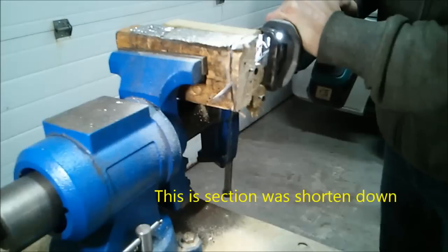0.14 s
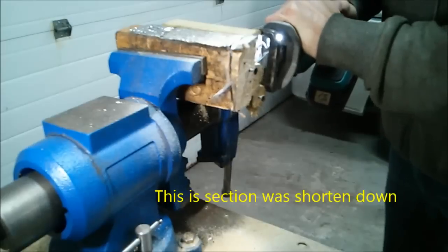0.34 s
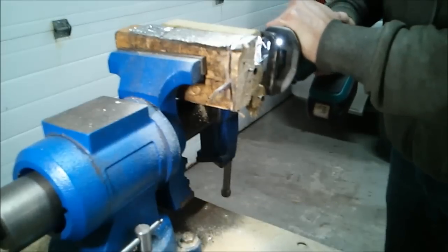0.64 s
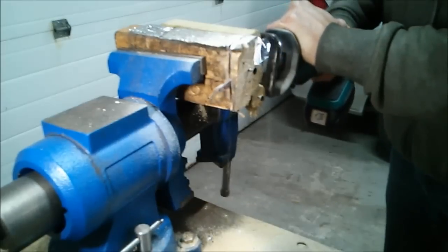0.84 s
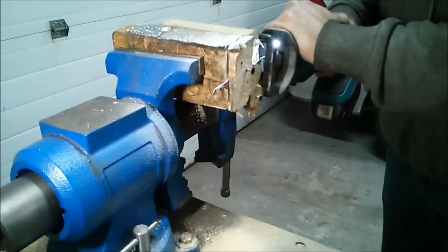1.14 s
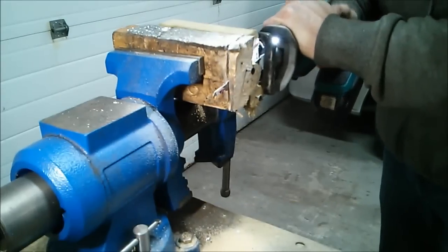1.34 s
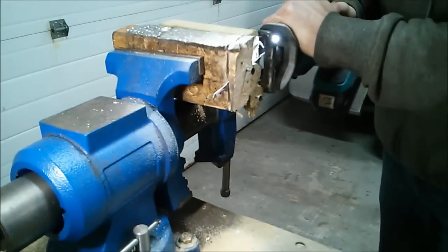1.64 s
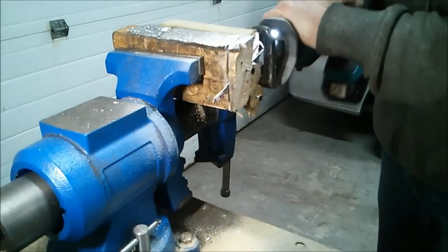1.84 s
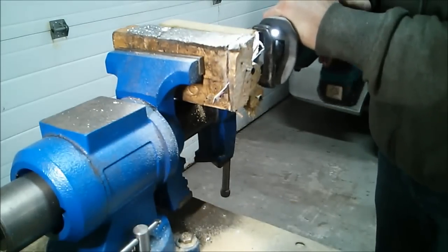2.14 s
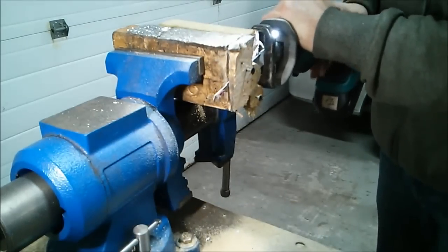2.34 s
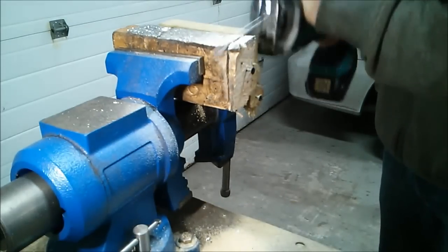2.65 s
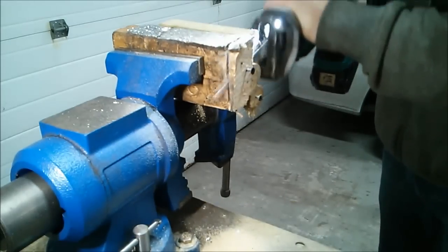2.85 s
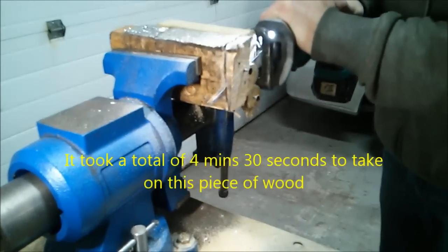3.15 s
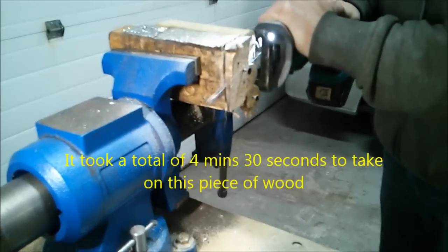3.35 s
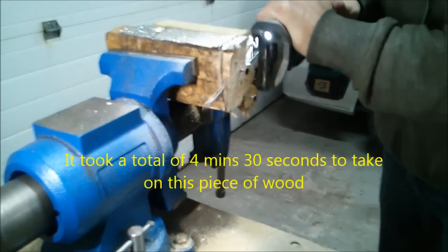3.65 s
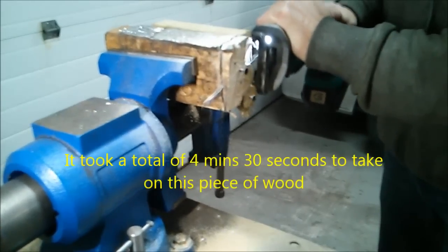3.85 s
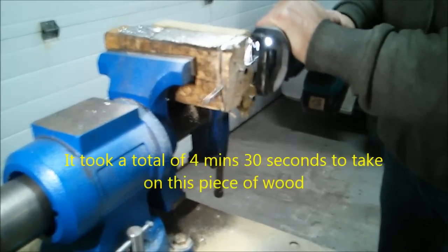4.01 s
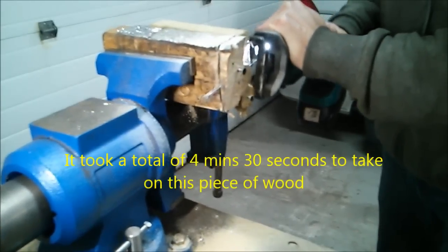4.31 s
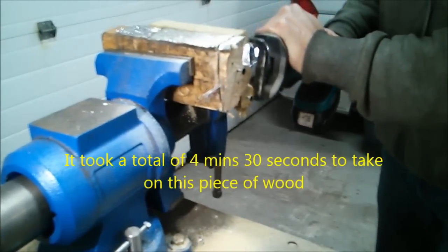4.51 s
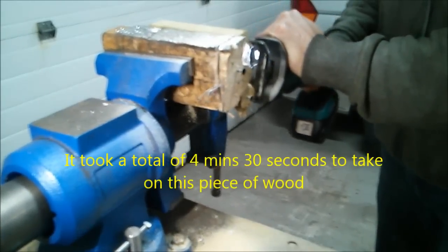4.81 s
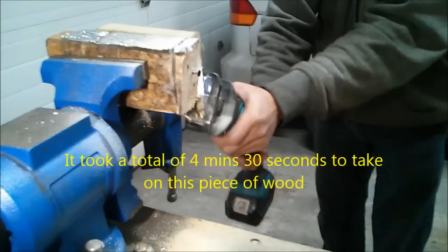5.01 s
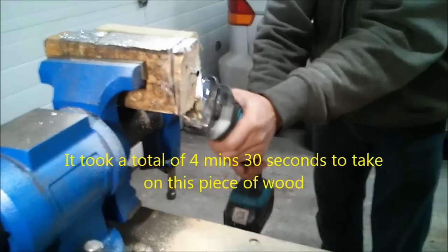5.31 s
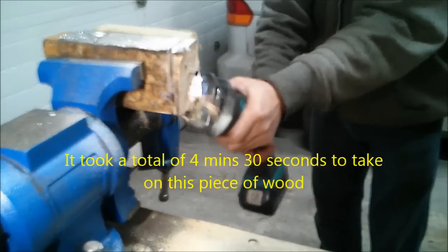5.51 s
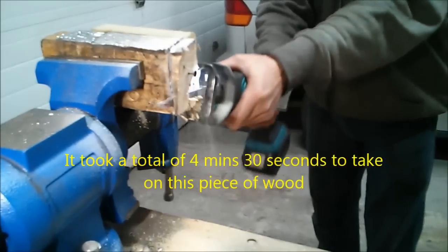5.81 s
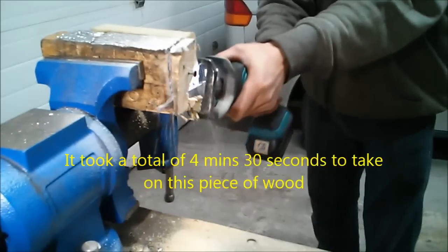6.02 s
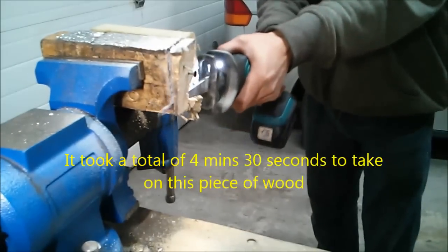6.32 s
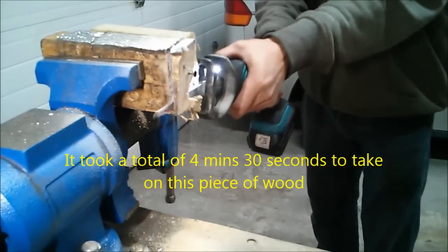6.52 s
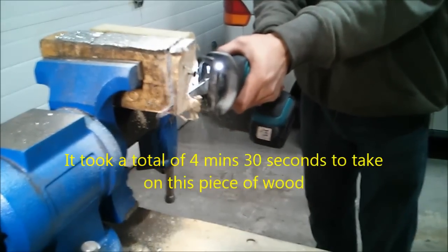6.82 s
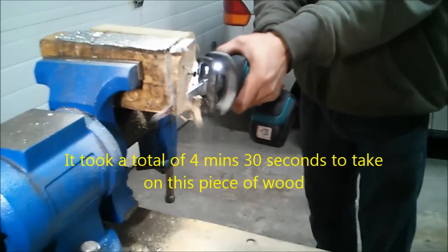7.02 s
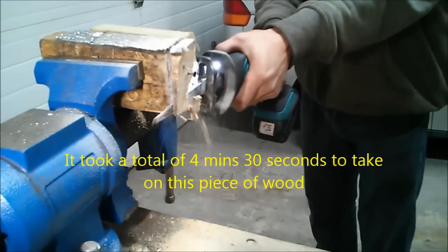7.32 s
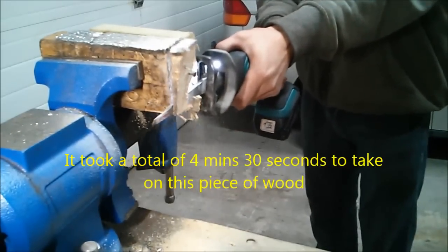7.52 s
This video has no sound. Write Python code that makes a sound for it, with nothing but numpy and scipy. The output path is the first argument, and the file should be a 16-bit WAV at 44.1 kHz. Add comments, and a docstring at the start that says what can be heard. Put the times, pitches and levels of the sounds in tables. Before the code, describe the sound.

A reciprocating saw labours through nail-ridden wood, jams with a clank, pauses amid small knocks, then restarts and grinds on with metallic squeals.

```python
"""A reciprocating saw is already labouring through a nail-ridden block held in a bench vice, in a workshop.
It jams, stops, is shifted about with small knocks, restarts and labours on. Each stroke jolts the bench,
rasps the wood and chatters on steel: trains of tooth impacts and noise are coloured by spectra and resonances.
Ringing blade tones and nail ticks lie on top; the microphone stands close, on the same bench, and overloads."""
import sys
import numpy as np
from scipy import signal
from scipy.fft import rfft, irfft
from scipy.io import wavfile
from scipy.ndimage import uniform_filter1d, minimum_filter1d

SR = 44100
rng = np.random.default_rng(int(sys.argv[2]) if len(sys.argv) > 2 else 0)


def transcribe(u):
    """Save the signal u as a 16-bit wav file named by the first command-line argument.

    u: samples, shape (n,) or (channels, n), limited to [-1, 1]; the rate is SR.
    q: integer samples, one column per channel.
    """
    v = np.clip(np.atleast_2d(u).T, -1, 1)
    q = np.round(v * 32767).astype(np.int16)
    wavfile.write(sys.argv[1], SR, q)


N = 337806
T = np.arange(N) / SR  # s

# Blade speed, sought until the next row. Each row: from s, strokes per s.
SPEED = [(0, 31.23), (.6, 28.3), (.85, 27.5), (1.2, 0), (2.6805, 38.4), (3, 37.25), (3.2, 33.78),
         (3.6, 31.66), (4.1, 33.03), (4.45, 28.69), (4.8, 27.17), (5.1, 29), (5.4, 26.53), (5.7, 31.37),
         (6, 33), (6.25, 35.26), (6.6, 30.77), (6.9, 33.27), (7.5, 36.5)]
# Motor on. Each row: from s, to s.
RUNNING = [(0, 1.17), (2.68, 7.7)]
# Shape of the stroke. Each row: time in s, bench jolt after the bite in strokes, pulsing depth in nominal dB,
# jolt regularity 0-1.
TIMING = [(0, .3, 3, .8), (.35, .3, 3, .85), (.6, .36, 13, .95), (.9, .36, 12, .93), (1.1, .38, 9, .88),
          (3.1, .22, 3, .6), (3.4, -.18, 4, .85), (3.7, -.12, 3, .85), (4.2, .34, 4, .88),
          (4.9, .36, 2, .88), (5.3, -.28, 2, .5), (5.8, -.45, 3, .25), (6.1, -.92, 5, .6),
          (6.4, -.9, 7.5, .6), (7.66, -.85, 8, .75)]

# Blade in the wood. Each row: time in s, rasp level in dB, hollow cut 0-1.
CUT = [(0, -11, 0.21), (.15, -9.5, 0.51), (.95, -5.5, 0.48), (1.1, -21.5, 0.3), (1.125, -26, 1),
       (1.17, -52, 1), (2.69, -58, 0.4), (2.73, -25, 0), (2.86, -19.5, 0.3), (3.02, -19, 0.2),
       (3.07, -6, 0.32), (3.5, -10.5, 0.18), (4.2, -9.5, 0.25), (4.55, -11.5, 0.3), (5.6, -13, 0.2),
       (6.15, -12, 0.61), (6.75, -11.5, 0.77), (7, -8, 0.69), (7.66, -13, 0.79)]
# Spectrum of the rasp deep in the block. Each row: Hz, relative density in dB.
SOLID = [(120, -41), (200, -3.5), (333, -6.5), (580, 3), (703, -4.5), (903, -4.5), (1010, -3), (1630, 3),
         (2800, -18.5), (3000, -21.5), (3900, -51), (6600, -120)]
# Spectrum of the rasp near the free end. Each row: Hz, relative density in dB.
HOLLOW = [(120, -40.5), (200, 9), (326, -27), (580, 1), (696, 1), (913, -2), (1180, -2.5), (1400, -10),
          (2160, -36), (3000, -27.5), (3900, -60.5), (6600, -120)]
# Resonances of block and vice. Each row: centre in Hz, width in Hz, level in dB.
BLOCK = [(325, 35, -1.5), (404, 68, 5), (620, 20, -10.5), (867, 68, 8), (955, 30, 0), (1093, 75, 4.5),
         (1300, 42, -6.5), (1560, 20, -20), (2410, 36, 0)]
# Resonances of the nearly cut-off end. Each row: centre in Hz, width in Hz, level in dB.
FREE_END = [(587, 25, -7.5), (884, 110, -9.5), (906, 89, 3.5), (1408, 90, 4), (2396, 35, 0.5)]

# Teeth on steel. Each row: time in s, chatter level in dB, bright chatter level in dB.
STEEL = [(0, -25.5, -45), (.09, -25, -33), (.13, -32, -16.5), (.77, -28, -23.5), (.98, -26, -16.5),
         (1.11, -32, -32), (1.125, -43, -22), (1.17, -34.5, -43), (2.69, -68, -85), (2.73, -28, -50),
         (2.85, -24.5, -32), (3.03, -23.5, -25.5), (3.08, -17, -16), (3.5, -22.5, -26.5), (4.0, -23, -28.5),
         (4.28, -19, -22), (4.55, -23, -28.5), (4.8, -20, -24.5), (5.46, -16, -21), (5.64, -20, -25.5),
         (5.92, -18.5, -24.5), (6.15, -35.5, -35), (6.45, -34, -30.5), (7, -27.5, -25.5), (7.44, -33, -22),
         (7.58, -30, -16.5), (7.66, -31, -25.5)]
# Spectrum of the chatter. Each row: Hz, relative density in dB.
CHATTER = [(1290, -14), (2200, -5), (2340, -6.5), (2820, -18), (2990, -11.5), (5670, -8.5), (5940, -8.5),
           (6600, -17), (8580, -38.5), (14500, -120)]
# Spectrum of the bright chatter. Each row: Hz, relative density in dB.
SIZZLE = [(3240, -41), (5500, -11.5), (5940, -3), (7520, 6.5), (9790, -4.5), (10700, -3.5), (15100, -8.5),
          (16300, -31.5)]
# Looseness of the blade clamp. Each row: time in s, slack (1 = clack as strong as the fizz).
SLACK = [(.6, .4), (1.1, 1), (3.1, .3), (5.8, .2), (7, .5), (7.25, 1.6), (7.66, 2)]
# Resonances of the blade clamp, passed twice. Each row: centre in Hz, width in Hz, level in dB per pass.
CLAMP = [(8230, 3800, 3.5), (9440, 1200, -5.5)]

# Shaking of the bench. Each row: time in s, vice rock level in dB, bench boom level in dB.
SHAKE = [(0, -6.5, -10), (.15, -19, -15), (.3, -10, -15), (.52, -11.5, -12), (.6, -18.5, -6),
         (.95, -10.5, -5.5), (1.06, -16, -7), (1.17, -45.5, -36), (2.69, -58.5, -53), (2.84, -34, -57),
         (2.88, -11.5, -21), (2.97, -55, -56), (3.09, -12.5, -10.5), (3.52, -11.5, -12.5),
         (4.1, -16.5, -11.5), (4.25, -26, -4), (4.38, -12, -14), (4.65, -18, -7), (5.03, -15.5, -9.5),
         (5.1, -26, -15.5), (5.46, -17, -17), (5.65, -12, -9), (6.15, -12.5, -12.5), (6.45, -23, -27),
         (6.8, -17.5, -9.5), (6.98, -24, -24), (7.44, -16, -20), (7.58, -17, -14.5), (7.66, -16, -41)]
# Sway of the legs over the rock of the vice. Each row: time in s, level in dB.
SWAY_DB = [(.2, -22), (1.1, -2.5), (3.1, -4.5), (5.6, 1), (6.1, -5), (6.9, 3.5), (7.4, -8)]
# The next three are passed twice, then levelled. Each row: centre in Hz, width in Hz, relative dB per pass.
# Bench on its legs:
SWAY = [(35.2, 14, -15.5), (63.4, 6.8, -6.5)]
# Vice rocking:
ROCK = [(96.6, 25, -7.5)]
# Bench top:
BOOM = [(140.3, 29, 0), (172.8, 17, -5), (232, 50, -17)]

# Low tones of the blade. Each row: Hz, relative level in dB, t60 in s.
BLADE_LOW = [(6085, -4, .3), (6135, 0, .2)]
# High tones of the blade. Each row: Hz, relative level in dB, t60 in s.
BLADE_HIGH = [(9880, 0, .14), (10700, -12, .16), (14370, -23, .12)]
# The blade squeals on a nail. Each row: start in s, length in s, low ring in dB, high ring in dB.
SQUEALS = [(1.115, 0.076, -18.5, -37), (4.212, 0.19, -21, -27.5), (4.7, 0.28, -25, -24.5),
           (5.014, 0.16, -15, -22), (5.223, 0.26, -14, -20), (5.408, .13, -14, -24),
           (5.535, 0.082, -16, -14.5), (5.67, 0.17, -23, -25), (5.82, .11, -16, -38),
           (5.966, .06, -31, -41), (6.923, 0.065, -16, -28)]
# Sharp ticks of teeth on nails. Each row: start in s, level in dB.
TICKS = [(0.1037, -21), (0.1311, -15), (0.1655, -22), (0.1989, -24), (0.4559, -13), (1.0152, -14),
         (1.1238, -33), (3.058, -12), (3.1088, -14), (5.555, -14), (5.8341, -14), (7.579, -26)]
# The hard last blow on the blade. One row: start in s, level in dB, lift of upper modes in dB per kHz.
JAM = (1.122, -21, 4)

# Handling knocks and catches of the blade. Each row: start in s, levels of ring, thud, wood and rattle in dB
# ahead of onset and decay, ring pitch in Hz.
KNOCKS = [(1.1232, -6.5, -23, -20, -10, 924), (1.2844, -41, -42, -40.5, -64, 890),
          (1.3326, -51, -25, -61, -57, 961), (1.4864, -54, -30, -56, -64, 2130),
          (1.5124, -51, -38, -42.5, -69, 2070), (1.5520, -50, -29, -63, -46, 2070),
          (1.5838, -45, -23.5, -45, -49, 1870), (1.6666, -18, -15, -25.5, -32, 1560),
          (1.7114, -35, -44, -45, -33, 1120), (1.7483, -42, -51, -57, -55, 1750),
          (1.8168, -40, -48, -74, -40, 969), (1.8637, -42.5, -60.5, -65, -46, 1800),
          (2.1274, -53, -63, -65.5, -67, 1900), (2.1644, -61.5, -59, -60, -63, 1510),
          (2.2368, -55, -60, -45.5, -51, 2530), (2.2586, -57, -42.5, -44.5, -64, 2040),
          (2.3478, -49.5, -45, -47, -47, 1750), (2.5574, -44.5, -69.5, -64, -48.5, 1710),
          (2.6054, -56.5, -65, -59, -54, 1930), (2.6683, -44, -48, -47, -54, 1830),
          (2.7275, -26, -28, -34, -45, 1140), (2.8513, -5, -8, -29, -15, 915),
          (2.8735, -12, -6, -34, -33, 1190), (2.9692, -3, -33, -31, -17, 1300),
          (3.0506, -2, -2.5, -30, -20, 935)]

# Level of the saw shoe. Each row: time in s, level in dB.
SHOE_DB = [(5.5, -74.5), (6, -27.5), (6.6, -34), (7, -40), (7.66, -36)]
# Saw shoe against the wood, passed twice. Each row: centre in Hz, width in Hz, relative dB per pass.
SHOE = [(4300, 300, 0)]
# Slap of the hanging end. Each row: time in s, level in dB.
FLAP_DB = [(5.95, -56), (6.3, -17), (6.65, -18), (6.95, -14.5), (7.3, -17.5), (7.66, -22.5)]
# Resonances of the hanging end, struck. Each row: centre in Hz, width in Hz, relative level in dB.
FLAP = [(1416, 100, 0), (900, 120, -9)]

# Spectrum of the background noise. Each row: Hz, relative density in dB.
FLOOR = [(18, -43.5), (30, -12.5), (114, 3), (359, -11), (414, -11.5), (910, -21.5), (1500, -17),
         (3070, -29), (9000, -30.5), (11700, -63.5), (19800, -120)]
# Reverberation of the workshop. Each row: Hz, t60 in s.
ROOM = [(100, 0.56), (500, 0.33), (2000, 0.28), (6000, 0.26), (14000, 0.31)]

FIRST_STROKE = -.19  # share of a stroke at the start
GLIDE_S = .12  # the motor takes this long to reach a new speed
# Past this pulsing depth the saw is ducked once a stroke: place and width in shares of a stroke,
# dB lost per dB of excess.
DUCK_DEPTH_DB, DUCK_AT, DUCK_WIDTH, DUCK_PER_DB = 8, .6, .11, 4
# Squeal fade in s; between squeals the rings lie this far in dB from the chatter level.
SQUEAL_EDGE_S, RING_LOW_DB, RING_HIGH_DB = 0.018, -13, -18
FLOOR_DB = -63
EDGE_HZ = 16150  # upper band limit


def amp(db):
    """Decibels to gain."""
    return 10 ** (np.asarray(db) / 20)


def evened(x):
    """Scales to rms 1."""
    return x / np.sqrt(np.mean(x ** 2) + 1e-20)


def levelled(x, span):
    """Holds the rms over span seconds near 1."""
    return x / np.sqrt(abs(uniform_filter1d(x ** 2, int(span * SR))) + 1e-6)


def read(points, hz):
    """Reads a table along log frequency."""
    f, value = np.transpose(points)
    return np.interp(np.log(hz + 1), np.log(f + 1), value)


def follow(table):
    """The columns of a curve for every sample."""
    s, *columns = np.transpose(table)
    return [np.interp(T, s, c) for c in columns]


def coloured(x, points):
    """Shapes the spectrum of x by a table and scales to rms 1."""
    gain = amp(read(points, np.fft.rfftfreq(len(x), 1 / SR)))
    return evened(irfft(rfft(x) * gain, len(x)))


def resonate(x, modes):
    """Sum of two-pole resonances, each with its table level as peak gain."""
    return sum(amp(db) * signal.lfilter(*signal.iirpeak(hz, hz / width, SR), x) for hz, width, db in modes)


def drift(span):
    """Slow chance of rms 1 that changes over span seconds."""
    size = int(span * SR)
    return evened(uniform_filter1d(uniform_filter1d(rng.standard_normal(N), size), size))


def shifting(x, modes, shift_db):
    """Resonances that take turns, as the blade presses now here, now there."""
    return sum(amp(shift_db * drift(0.074)) * resonate(x, [mode]) for mode in modes)


def controls():
    """Strokes made so far, from the gliding blade speed, and whether the motor runs."""
    s, per_s = np.transpose(SPEED)
    held = per_s[np.searchsorted(s, T, "right") - 1]
    turns = FIRST_STROKE + np.cumsum(uniform_filter1d(held, int(GLIDE_S * SR))) / SR
    running = sum((T >= on) & (T < off) for on, off in RUNNING)
    return turns, uniform_filter1d(running * 1., size=400)


def teeth(turns, depth_db, per_s, spread_db, uneven_db):
    """A dense train of tooth impacts that bites quickly and eases off once a stroke."""
    size = amp(spread_db * np.minimum(rng.exponential(1, N), 5)) * rng.choice([-1., 1.], N)
    train = size * (rng.random(N) < per_s / SR)
    angle = 2 * np.pi * turns
    swell = np.minimum(np.cos(angle + .5 * np.cos(angle)), .2)
    return train * amp(depth_db * swell + uneven_db * drift(0.0045))


def rasp(turns, depth_db, db, hollow):
    """Teeth tear the wood; block and vice colour it, the free end rings more."""
    drive = teeth(turns, depth_db, per_s=5000, spread_db=1.5, uneven_db=3.0)
    solid = coloured(1.14 * drive + shifting(drive, BLOCK, 4.6), SOLID)
    free = coloured(0.27 * drive + shifting(drive, FREE_END, 6.1), HOLLOW)
    hollow = np.clip(hollow, 0, 1)
    return amp(db) * levelled((1 - hollow) * solid + hollow * free, 0.091)


def chatter(turns, depth_db, db, bright_db, slack):
    """Steel on steel: a fizz of teeth, and a snap of the slack blade clamp at each reversal."""
    forward = np.exp(-(turns % 1) / .14)
    backward = .45 * np.exp(-((turns + .6) % 1) / .12)
    snap = (forward + backward) * amp(1.5 * drift(.03))
    drive = teeth(turns, 0.07 * depth_db, per_s=12000, spread_db=2.5, uneven_db=3.0)
    low = coloured(drive * (0.5 + 0.013 * depth_db * snap), CHATTER)
    clack = evened(resonate(resonate(rng.standard_normal(N) * snap, CLAMP), CLAMP))
    fizz = coloured(drive * (0.5 + 0.037 * depth_db * snap), SIZZLE)
    high = fizz + slack * clack
    return amp(db) * levelled(low, .11) + amp(bright_db) * levelled(high, .11)


def bench(turns, regular, levels_db):
    """One jolt a stroke, and uneven shaking between, sets the bench ringing."""
    jolts = np.diff(np.floor(turns), prepend=np.floor(turns[0])) * amp(2.8 * drift(.02))
    drive = regular * evened(jolts) + (1 - regular) * rng.standard_normal(N)
    parts = (levelled(resonate(resonate(drive, modes), modes), .11) for modes in (SWAY, ROCK, BOOM))
    return sum(amp(db) * part for db, part in zip(levels_db, parts))


def ringing(modes, lift_db):
    """The dying tones of the blade after one tap; lift_db per kHz tilts them about 10 kHz."""
    t = np.arange(SR // 2) / SR
    return sum(amp(level + lift_db * (hz / 1000 - 10) - 60 * t / t60) * np.sin(2 * np.pi * hz * t)
               for hz, level, t60 in modes)


def squeal(chatter_db, under_db, index):
    """Level of a blade ring: it trails the chatter and swells during each squeal."""
    gain = amp(chatter_db + under_db)
    for row in SQUEALS:
        start, end = row[0], row[0] + row[1]
        fade = np.clip(np.minimum(T - start, end - T) / SQUEAL_EDGE_S, 0, 1)
        gain = gain + amp(row[index]) * fade
    return gain


def blade(modes, gain, running):
    """Scattered taps on nails keep the blade ringing; the cut grips and frees it, and it rings out after the stop."""
    per_s = 900
    taps = rng.standard_normal(N) * (rng.random(N) < per_s / SR) * gain * running
    ring = ringing(modes, 0)
    ring = ring / np.linalg.norm(ring) * np.sqrt(SR / per_s)
    grip = amp(2.5 * drift(.012) * running)
    return signal.oaconvolve(taps, ring)[:N] * grip


def nails():
    """Bright ticks of decaying noise, and the hard last blow that leaves the blade ringing."""
    out, t = np.zeros(N + SR), np.arange(600) / SR
    for s, db in TICKS:
        bright = np.diff(rng.standard_normal(len(t) + 1))
        out[int(s * SR):][:len(t)] += amp(db) * bright * np.exp(-t / 0.003)
    s, db, lift_db = JAM
    out[int(s * SR):][:SR // 2] += amp(db) * ringing(BLADE_LOW + BLADE_HIGH, lift_db)
    return out[:N]


def duck(turns, depth_db):
    """Gain of a short dip in the cutting sound once a stroke, as if the overloaded input ducked it under the boom."""
    moment = np.exp(-(((turns - DUCK_AT + .5) % 1 - .5) / DUCK_WIDTH) ** 2)
    return amp(-DUCK_PER_DB * np.maximum(depth_db - DUCK_DEPTH_DB, 0) * moment)


def knocks():
    """Each knock is a short ring at its pitch, a woody note, a rattle and a thud in the bench."""
    out, t = np.zeros(N + 8000), np.arange(8000) / SR
    rise = 1 - np.exp(-t / 0.0025)
    for s, db, thud_db, wood_db, rattle_db, hz in KNOCKS:
        noise = rng.standard_normal(len(t))
        ring = evened(resonate(resonate(noise, [(hz, 500, 0)]), [(hz, 900, 0)])) * np.exp(-t / 0.0077)
        wood = evened(resonate(resonate(noise, [(540, 170, 0)]), [(560, 390, 0)])) * np.exp(-t / 0.015)
        rattle = evened(resonate(noise, [(3440, 900, 0.5), (4830, 910, 19), (6470, 870, -10.5)]))
        rattle = rattle * np.exp(-t / 0.0072)
        thud = np.sin(2 * np.pi * 108 * t) * np.exp(-t / 0.015)
        knock = amp(db) * ring + amp(wood_db) * wood + amp(rattle_db) * rattle + amp(thud_db) * thud
        out[int(s * SR):][:len(t)] += rise * knock
    return out[:N]


def shoe(turns, db):
    """The saw shoe pings against the wood twice a stroke, once harder."""
    knock = np.exp(-(turns % 1) / .07) + .5 * np.exp(-((turns + .5) % 1) / .07)
    drive = rng.standard_normal(N) * (.15 + knock) * amp(2 * drift(.02))
    return amp(db) * evened(resonate(resonate(drive, SHOE), SHOE))


def flap(turns, db):
    """Once a stroke the hanging end slaps the block and rings briefly."""
    rough = 1 + 0.4 * rng.standard_normal(N)
    burst = np.exp(-(turns % 1) / 0.033) * rough * np.sin(2 * np.pi * 1200 * T)
    return amp(db + 3.9 * drift(0.019)) * evened(resonate(burst, FLAP))


def bench_echo(x):
    """The bench top throws the upper middle range back 3 ms late, which combs it."""
    band = signal.firwin(129, [2000, 5200], pass_zero=False, fs=SR)
    lag = round(.003 * SR) - len(band) // 2  # the filter itself delays by half its length
    return x + 0.58 * np.r_[np.zeros(lag), np.convolve(x, band)][:N]


def room(x):
    """Workshop reverberation: sparse taps of random sign, each band dying at its own speed."""
    taps = np.zeros(SR // 2)
    at = np.arange(400, len(taps) - 20, 20)
    taps[at + rng.integers(0, 20, len(at))] = rng.choice([-1., 1.], len(at))
    hz, t, z = signal.stft(taps, SR, nperseg=256)
    decay = amp(-60 * t / read(ROOM, hz)[:, None])
    tail = signal.istft(z * decay, SR, nperseg=256)[1]
    return signal.fftconvolve(x, tail / np.linalg.norm(tail))[:N]


def background():
    """Faint coloured noise whose level drifts slightly."""
    return amp(FLOOR_DB + 1.5 * drift(.03)) * coloured(rng.standard_normal(N), FLOOR)


def scene():
    """Saw, bench and knocks in the workshop; offsets to turns place each sound within the stroke."""
    turns, running = controls()
    jolt, depth_db, regular = follow(TIMING)
    rasp_db, hollow = follow(CUT)
    chatter_db, bright_db = follow(STEEL)
    rock_db, boom_db = follow(SHAKE)
    bench_db = [rock_db + follow(SWAY_DB)[0], rock_db, boom_db]

    cutting = rasp(turns + .08, depth_db, rasp_db, hollow)
    cutting = cutting + flap(turns + .2, *follow(FLAP_DB))
    steel = chatter(turns + .17, depth_db, chatter_db, bright_db, *follow(SLACK))
    steel = steel + shoe(turns - .22, *follow(SHOE_DB))
    ring = blade(BLADE_LOW, squeal(chatter_db, RING_LOW_DB, index=2), running)
    ring = ring + blade(BLADE_HIGH, squeal(chatter_db, RING_HIGH_DB, index=3), running)

    saw = bench_echo(running * duck(turns, depth_db) * (cutting + steel) + ring + nails())
    saw = saw + running * bench(turns - jolt, regular, bench_db)
    handling = bench_echo(knocks())
    reverb = room(amp(-10.5) * saw + amp(-7.5) * handling)
    return (saw + handling + reverb + background())[None]


def record(dry):
    """At the microphone a quick limiter rides the peaks, the input stage rounds the rest; then the band limit."""
    peak = -minimum_filter1d(-abs(dry), size=221, axis=1)
    limited = dry * uniform_filter1d(np.minimum(1, 1.243 / (peak + 1e-9)), size=111, axis=1)
    squeezed = 1.104 * np.tanh(amp(2.0) * limited / 1.164)
    band_limit = signal.firwin(511, EDGE_HZ, window=("kaiser", 11), fs=SR)
    return signal.oaconvolve(squeezed, band_limit[None], "same")


dry = scene()
out = record(dry)
transcribe(out)
```